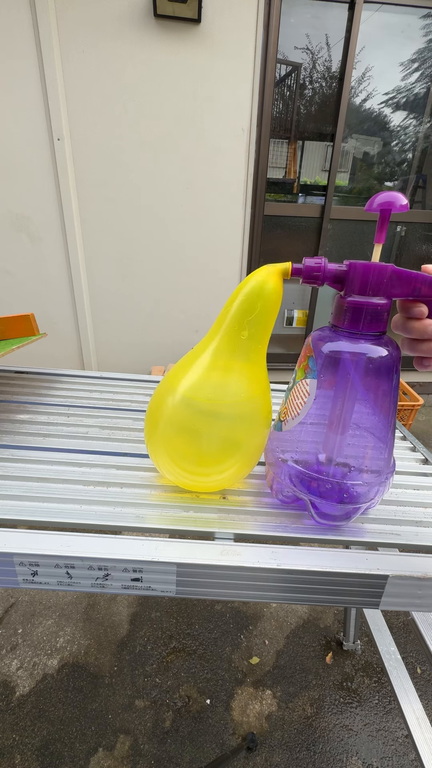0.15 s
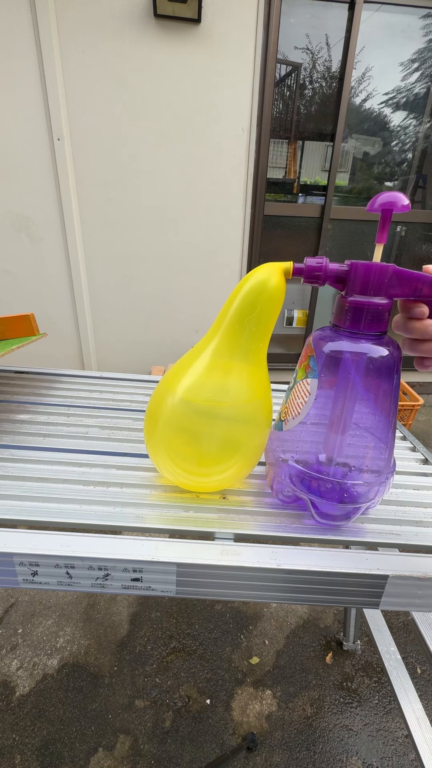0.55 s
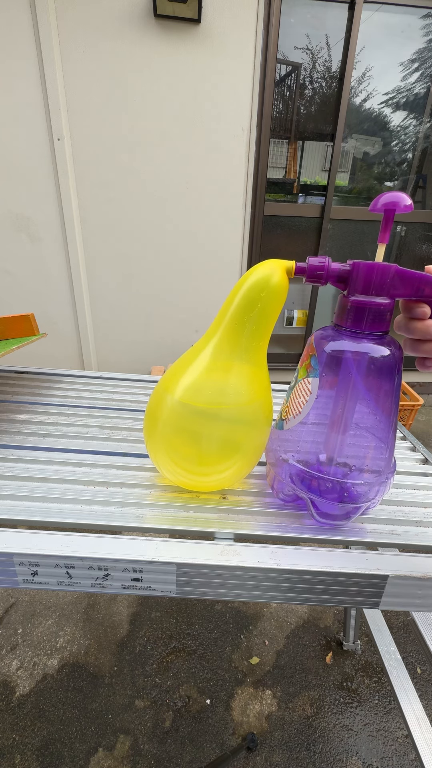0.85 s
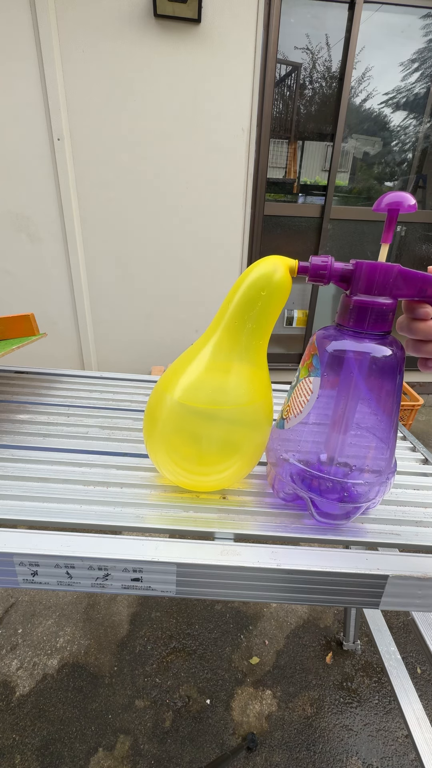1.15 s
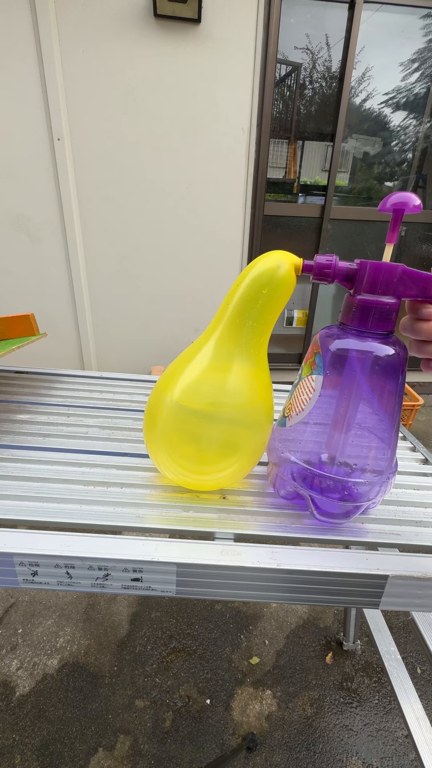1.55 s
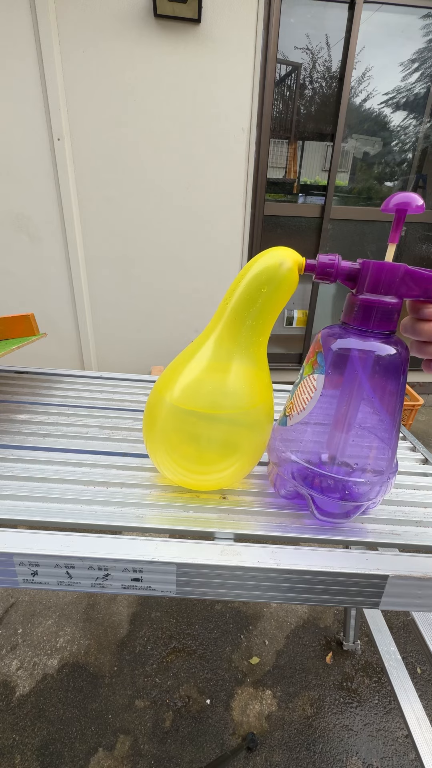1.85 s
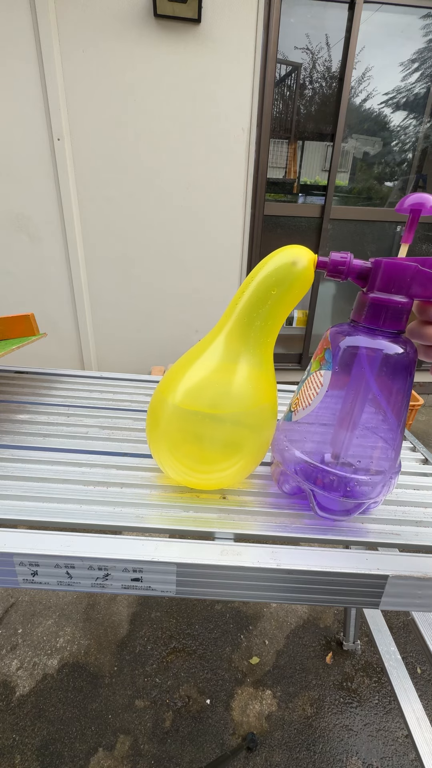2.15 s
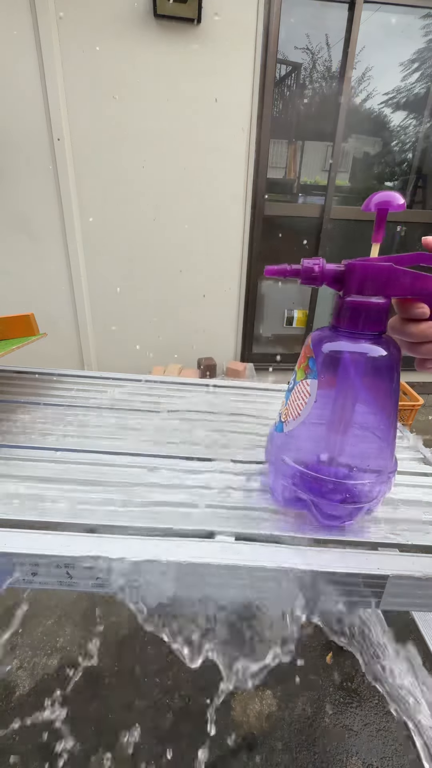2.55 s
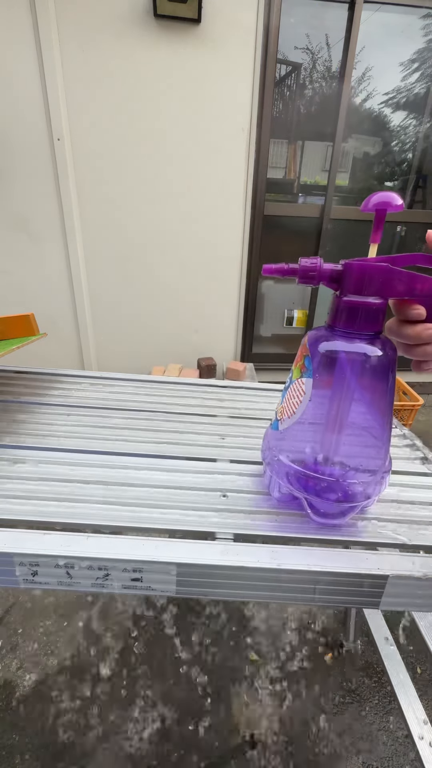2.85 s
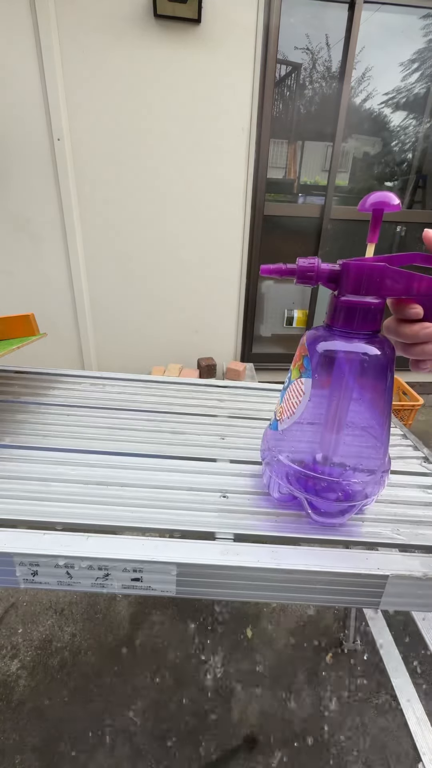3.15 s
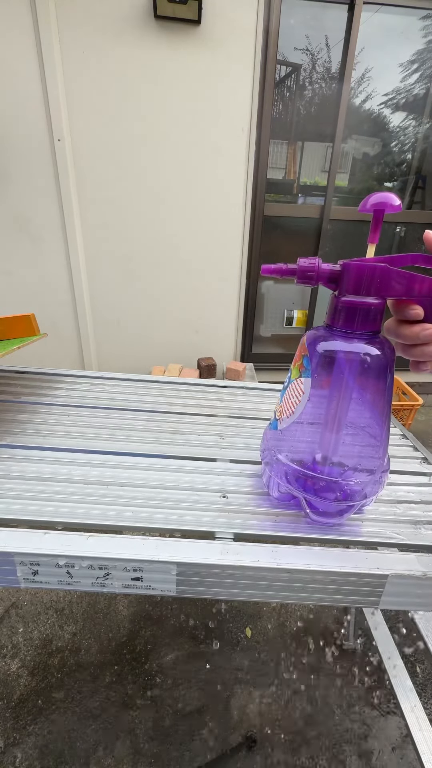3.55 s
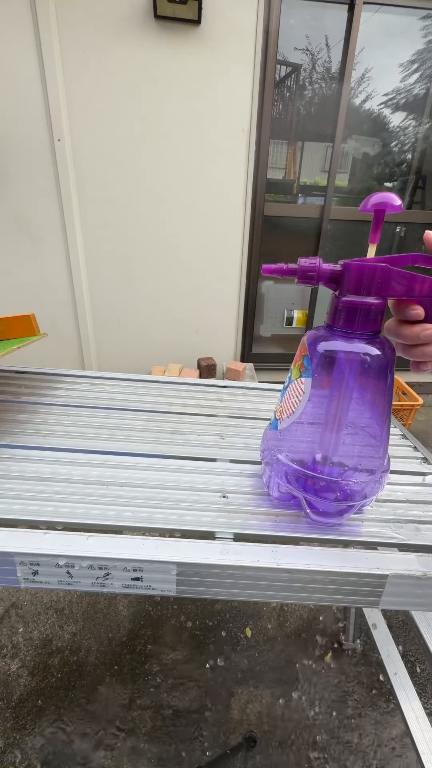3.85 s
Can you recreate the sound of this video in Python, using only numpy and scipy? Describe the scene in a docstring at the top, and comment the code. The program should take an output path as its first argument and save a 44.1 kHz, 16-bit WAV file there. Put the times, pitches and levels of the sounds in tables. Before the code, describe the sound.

A water balloon bursts outdoors: a hand sprayer hisses and gurgles into it, stops, a few ticks, then a sharp loud snap; water spatters onto concrete and thins to drips, close stereo microphone.

```python
"""In a yard with distant air and a mains machine humming nearby, a hand sprayer fills a rubber balloon on a metal table:
shaped noise hisses, gurgling pings rise in it, and the valve shuts at about 2 s. After a few ticks the balloon
tears in rasping noise and wavering tones, snaps, and its air blast thumps in low sagging sines; the background dips.
The water pours off the table onto concrete as grainy noise, with slaps, then thins to ringing drips.
Two microphone ports hear it; much of the treble reaches the right one slightly first."""
import sys
import numpy as np
from scipy import signal
from scipy.fft import rfft, irfft, next_fast_len
from scipy.io import wavfile
from scipy.ndimage import uniform_filter1d, map_coordinates

SR = 44100
rng = np.random.default_rng(int(sys.argv[2]) if len(sys.argv) > 2 else 0)


def gain_from_db(level_db):
    """Turn a decibel level (scalar or array-like) into a linear amplitude factor."""
    decades = np.asarray(level_db, float) / 20
    return 10 ** decades


def master_out(mix):
    """Clip the mix to full scale and print it as 16-bit PCM to the path in sys.argv[1]."""
    frames = np.transpose(np.atleast_2d(mix))
    ceiling = np.clip(frames, -1, 1)
    pcm = np.round(ceiling * 32767).astype(np.int16)
    wavfile.write(sys.argv[1], SR, pcm)


N = 176400

# how alike the jet is at the two microphone ports: (frequency [Hz], likeness [-1 to 1])
JET_LIKENESS = [(100, 1), (600, 0.69), (1500, 0.97), (2400, 1), (3300, 0.67), (5000, 0.39), (7000, 1),
                (16000, 1)]
# how alike the loose water and the echo are at the two ports: (frequency [Hz], likeness [-1 to 1])
WET_LIKENESS = [(100, 0.44), (600, 0.12), (2400, 0.74), (5000, 0.37), (8000, 1), (16000, .9)]


def unit(x):
    """Scale to rms 1."""
    return x / np.sqrt(np.mean(x ** 2) + 1e-20)


def along(points, hz):
    """Read (frequency, value) points along a log frequency axis."""
    f, v = np.transpose(points)
    return np.interp(np.log(hz + 1), np.log(f + 1), v)


def curves(rows):
    """One value per sample for each column after the time."""
    s, *cols = np.transpose(rows)
    return [np.interp(np.arange(N) / SR, s, c) for c in cols]


def wobble(rate):
    """A smooth random curve, rate knots a second."""
    knots = rng.standard_normal(int(N * rate / SR) + 4)
    return map_coordinates(knots, [np.arange(N) * rate / SR])


def filtered(x, response):
    """x times a complex response of frequency."""
    m = next_fast_len(N + 8192)
    return irfft(rfft(x, m) * response(np.fft.rfftfreq(m, 1 / SR)), m)[..., :N]


def shaped_noise(spectrum):
    """Independent noise for each port, coloured by (frequency, level) points; rms 1."""
    return unit(filtered(rng.standard_normal((2, N)), lambda hz: gain_from_db(along(spectrum, hz))))


def ports(pair, likeness):
    """A direct and a scattered sound at two ports; the direct one trails in phase at the left port."""
    # phase by which the left port trails the right: (frequency [Hz], phase [half turns])
    trail = [(1000, 0), (4500, .1), (6300, .4), (8300, .65), (9600, .5), (10900, 1), (13800, 1),
             (15000, 1.2), (16000, 1.35)]

    def turn(hz):
        return np.arccos(np.clip(along(likeness, hz), -1, 1)) / 2

    def lag(hz):
        return np.exp(np.outer([-1j, 1j], np.pi / 2 * along(trail, hz)))

    direct = filtered(pair[0], lambda hz: np.cos(turn(hz)) * lag(hz))
    scattered = filtered(pair[1], lambda hz: np.sin(turn(hz)))
    return direct + [[1], [-1]] * scattered


def water(spectrum, likeness, band, patchy_db, grainy_db, count):
    """Patchy noise plus about count tiny impacts a second of scattered size, coloured; mono rms 1 within the band."""
    grain_t60_s = .0025
    z = signal.stft(rng.standard_normal((2, N)), nperseg=512)[2]
    field = uniform_filter1d(rng.standard_normal(z.shape[1:]), size=4, axis=0)
    field = uniform_filter1d(field, size=4, axis=1)
    noise = signal.istft(z * gain_from_db(patchy_db * unit(field)), nperseg=512)[1][:, :N]
    hits = (rng.random(N) < count / SR) * rng.uniform(0.38, 1.4, N) ** 2
    hits = signal.lfilter([1], [1, -gain_from_db(-60 / SR / grain_t60_s)], hits)
    hits = hits * rng.standard_normal((2, N))
    # close the spectrum just outside its end points
    shut = [(spectrum[0][0] * .7, -120)] + list(spectrum) + [(spectrum[-1][0] * 1.1, -120)]
    mixed = unit(noise) + gain_from_db(grainy_db) * unit(hits)
    x = ports(filtered(mixed, lambda hz: gain_from_db(along(shut, hz))), likeness)
    return x / np.std(filtered(x.mean(0), lambda hz: (hz > band[0]) & (hz < band[1])))


def add(track, s, sound):
    """Mix a sound in at a time."""
    part = track[:, round(s * SR):][:, :sound.shape[-1]]
    part += sound[..., :part.shape[1]]


def yard():
    """Distant air is steady coloured noise; the mains hum is two sines unsteady in level and phase."""
    # hum of the machine nearby: (frequency [Hz], level [dB])
    hum_tones = [(119, -52), (242.2, -52.5)]
    # colour of the distant air: (frequency [Hz], density [dB])
    air_spectrum = [(25, 2), (60, 11.5), (200, 9), (500, 4), (1000, -1), (2400, -8.5), (4500, -13),
                    (6500, -10), (10000, -14.5), (12700, -18), (15700, -15)]
    # the air at the two ports: (frequency [Hz], likeness [-1 to 1])
    air_likeness = [(40, 1), (200, 0.93), (700, 0.25), (3000, 0.29), (16000, 0.63)]
    # the background sinks after the burst: (time [s], level [dB])
    dip = [(2.3, 0), (2.33, -10), (2.44, -14), (2.462, -28), (2.495, -28), (2.53, -13), (2.64, 0)]
    air_db = -54
    t = np.arange(N) / SR
    hum = 0
    for hz, db in hum_tones:
        level = np.sqrt(2) * gain_from_db(db + 0.57 * wobble(6.18))
        hum = hum + level * np.sin(2 * np.pi * hz * t + 0.88 * wobble(5.3))
    air = water(air_spectrum, air_likeness, (300, 4000), patchy_db=1.8, grainy_db=-32, count=300)
    return gain_from_db(curves(dip)[0]) * (gain_from_db(air_db) * air + hum * gain_from_db([[-.5], [.5]]))


def slaps():
    """Lumps of water landing flat: dull noise that starts at once at each impact and dies exponentially."""
    # slaps of heavy water: (time [s], level [dB])
    impacts = [(2.756, -32), (2.851, -26), (2.862, -29), (2.875, -28), (2.9165, -29)]
    # their colour: (frequency [Hz], density [dB])
    slap_spectrum = [(200, -40), (400, -3), (800, 0), (1700, -3.5), (3000, -8.5), (6000, -31)]
    t60_s = 0.025
    t = np.arange(N) / SR
    env = sum((t > s) * gain_from_db(db - 60 * np.abs(t - s) / t60_s) for s, db in impacts)
    return ports(env * shaped_noise(slap_spectrum), WET_LIKENESS)


def drops():
    """Each drop: a tick and crack, a rising ring with a stray second tone near its pitch, then a little spray."""
    # single drops and ticks: (time [s], level [dB], starting ring pitch [Hz])
    landings = [(2.2214, -33, 7300), (2.228, -26, 7100), (2.2385, -30.5, 2600), (2.7292, -26, 6500),
                (2.85, -32, 1070), (2.8595, -29, 1550), (2.8754, -23, 6360), (2.892, -17, 2930),
                (2.911, -18, 2493), (2.9177, -19.5, 2500), (2.942, -23, 6900), (2.948, -20, 5840),
                (2.987, -23, 2100), (3.076, -13.5, 8140), (3.105, -24, 2700), (3.1357, -11, 9200),
                (3.168, -25, 3100), (3.214, -25, 7380), (3.2572, -22, 6500), (3.291, -29.5, 5830),
                (3.3216, -28, 4160), (3.329, -27.5, 3930), (3.345, -28, 6600), (3.3778, -19, 7400),
                (3.421, -20.5, 6640), (3.446, -22, 6170), (3.4689, -25, 2880), (3.489, -22, 8140),
                (3.541, -21.5, 7400), (3.5774, -19, 8500), (3.605, -32, 7300), (3.6364, -23.5, 8500),
                (3.6629, -23.5, 3130), (3.6672, -18.5, 7430), (3.707, -30, 6820), (3.725, -23.5, 7500),
                (3.7388, -22, 9150), (3.7572, -18, 7300), (3.7635, -25, 6500), (3.7735, -30.5, 6700),
                (3.806, -25, 6750), (3.812, -41, 3220), (3.837, -25.5, 2900), (3.8679, -29, 5300),
                (3.883, -22, 8000), (3.8889, -17, 8500), (3.89, -37, 3000), (3.9172, -21.5, 3270)]
    ring_cycles = 5.6  # nominal cycles to fall 15 dB
    tick_gain, crack_gain = 0.71, 0.38  # the tick is the first bright instant of contact
    spray_db, spray_s = -14, 0.032  # starting level, time to fall 20 dB
    spread = 1.48  # crack and spray are filtered to within this factor of the ring
    out, t = np.zeros((2, N)), np.arange(SR // 20) / SR

    def tone(f):
        wave = np.sin(2 * np.pi * f * t * (1 + 12 * t) + [[0], [np.pi / 2]])
        return wave * gain_from_db(-60 * t * f / (4 * ring_cycles)) * (1 - np.exp(-t * f))

    for s, db, hz in landings:
        ring = tone(hz) + 0.3 * tone(min(hz * rng.uniform(0.83, 1.6), 15000))
        band = signal.butter(2, np.clip([hz / spread, hz * spread], 100, 20000), "bandpass", fs=SR)
        noise = 0.47 * unit(signal.lfilter(*band, rng.standard_normal((2, len(t)))))
        flicker = 4.84 * np.repeat(rng.standard_normal(len(t) // 45), 45)  # dB, in steps of about 1 ms
        spray = gain_from_db(spray_db - 60 * t / (3 * spray_s) + flicker)
        crack = crack_gain * gain_from_db(-60 * t / 0.0054)
        tick = tick_gain * np.diff(rng.standard_normal((2, len(t) + 1))) * gain_from_db(-60 * t / 0.0044)
        add(out, s, gain_from_db(db) * (1.26 * ring + tick + noise * (crack + spray)))
    return ports(out, WET_LIKENESS) * gain_from_db([[-.5], [.5]])


def fall():
    """The sheet of water breaks on table and concrete as grainy noise; the thinner it runs, the clumpier."""
    # falling water: (time [s], spatter level [dB], heavy splash level [dB])
    flow = [(2.3, -120, -120), (2.33, -53.5, -71), (2.38, -70.5, -78), (2.45, -62, -64), (2.5, -67, -60.5),
            (2.53, -66, -50.5), (2.58, -53, -51.5), (2.66, -55, -50), (2.715, -52, -52.5),
            (2.73, -38.5, -46), (2.84, -35.5, -48), (2.852, -36, -48), (2.89, -35, -41), (2.92, -33.5, -42),
            (2.98, -31, -36.5), (3.05, -32.5, -43.5), (3.15, -36, -45), (3.2, -41, -61), (3.3, -47.5, -81),
            (3.5, -52, -81), (3.63, -53, -81), (3.75, -49, -81), (4, -47.5, -79)]
    # bright spatter: (frequency [Hz], density [dB])
    spatter_spectrum = [(1300, -33), (2500, -7.5), (4500, -6.5), (6200, -1), (7200, -0.5), (8200, 3),
                        (9300, -2), (11000, -0.5), (12700, -8.5), (14500, 6.5), (15700, -2)]
    # heavy splash: (frequency [Hz], density [dB])
    splash_spectrum = [(300, -24), (500, -12), (1000, -11), (1700, -4), (2500, 0), (3400, -3), (5000, -7)]
    thin_db, clumps_per_db = -36, 0.1  # below this spatter level the flow breaks into dribbles
    spatter_db, splash_db = curves(flow)
    thinness = np.clip(thin_db - spatter_db, 0, 15) * (np.arange(N) > 3 * SR)  # only after 3 s
    clump_db = (1.5 + clumps_per_db * thinness) * (wobble(45) + 0.92 * wobble(140))
    spatter = water(spatter_spectrum, WET_LIKENESS, (4000, 10000), patchy_db=4.0, grainy_db=-2.5, count=700)
    splash = water(splash_spectrum, WET_LIKENESS, (500, 3000), patchy_db=2.8, grainy_db=0, count=500)
    splash_level = gain_from_db(splash_db + 0.34 * clump_db + 0.97 * wobble(30.32))
    return gain_from_db(spatter_db + clump_db) * spatter + splash_level * splash


def tearing_skin(t):
    """The tearing rubber rasps as coloured noise and rings in tones of wandering phase."""
    # the tear: start, loud from, end [s]
    start, loud, end = [2.2835, 2.294, 2.3035]
    # tones of the skin: (frequency [Hz], level [dB], left over right [dB], likeness [-1 to 1])
    skin_tones = [(180, -19, -3, .6), (320, -17, 0, -.7), (555, -12, 0, -.3), (775, -12, 1, -.3),
                  (920, -18, 0, -.3), (1080, -25, 0, .5), (2550, -25, 0, .8), (2870, -23, -3, .7),
                  (3550, -28, 0, .5)]
    # colour of the rasp: (frequency [Hz], density [dB])
    rasp_spectrum = [(60, -40), (120, -11), (300, -5.5), (900, -6), (1200, -14), (2000, -11), (4000, -10),
                     (8000, -18.5), (10500, -30), (15500, -46)]
    rasp_db, waver = -18.5, .55  # waver scales the phase wander, radians
    rise = np.clip((t - start) / (loud - start), 0, 1) ** 1.5
    tear = rise * gain_from_db(-60 * np.clip(t - end, 0, 1) / 0.004)
    skin = 0
    for hz, db, pan_db, likeness in skin_tones:
        phase = 2 * np.pi * hz * (t - end) + rng.uniform(0, 2 * np.pi) + waver * wobble(200)
        between_ports = np.array([[0], [1]]) * np.arccos(np.clip(likeness, -1, 1))
        skin = skin + gain_from_db(db + np.array([[.5], [-.5]]) * pan_db) * np.sin(phase + between_ports)
    return tear * (skin + gain_from_db(rasp_db) * shaped_noise(rasp_spectrum))


def squeal(t):
    """The taut rubber's brief squeal: a sine under a bell-shaped envelope, louder on the left."""
    # frequency [Hz], level [dB], middle [s], half length [s]
    hz, db, middle, half = (4957, -19, 2.2945, .0035)
    bell = np.exp(-.5 * ((t - middle) / half) ** 2)
    return gain_from_db(db + np.array([[4], [-6]])) * bell * np.sin(2 * np.pi * hz * t + [[0], [1.4]])


def snaps_and_thumps():
    """The skin snaps free in damped sines; the burst's air blast thumps at the ports in sines sagging in pitch."""
    # snaps of the skin: (time [s], level [dB], frequency [Hz])
    snaps = [(2.2957, -3, 1300), (2.3031, 1, 1800)]
    # low thumps of the burst's air blast at the microphone ports, sagging in pitch:
    # (time [s], level [dB], from [Hz], sagging to [Hz], decay by 60 dB [s], attack [s])
    thumps = [(2.303, -22, 110, 30, .14, .002), (2.386, -26, 105, 62, .16, .03),
              (2.475, -44, 70, 50, .1, .01), (2.58, -42, 60, 50, .12, .015), (2.655, -43, 55, 45, .3, .02)]
    sag_s = .02
    out, u = np.zeros((2, N)), np.arange(SR // 2) / SR
    for s, db, hz in snaps:
        fade = gain_from_db(db - 60 * u * hz / 5.0)  # 60 dB in five cycles
        add(out, s, fade * np.sin(2 * np.pi * hz * u - 1.2) * (1 - np.exp(-u / 6e-5)))
    for s, db, from_hz, to_hz, t60, attack in thumps:
        turns = to_hz * u + (from_hz - to_hz) * sag_s * (1 - np.exp(-u / sag_s))
        thump = gain_from_db(db - 60 * u / t60) * np.sin(2 * np.pi * turns + [[1.3], [0]])
        add(out, s, thump * (1 - np.exp(-u / attack)) * [[.75], [1.25]])
    return out


def yard_echo(t):
    """The yard's answer to the tear: a diffuse noise that swells, then decays exponentially."""
    # the tear: start, loud from, end [s]
    tear_end = [2.2835, 2.294, 2.3035][2]
    # colour of the answer: (frequency [Hz], density [dB])
    echo_spectrum = [(250, -3), (700, 1.5), (1500, -8), (3000, -12), (5000, -22)]
    # between these times an extra 40 dB fade sets in: start, end [s]
    fade_s = [2.42, 2.47]
    peak_s, peak_db, t60_s = 2.322, -41.5, 0.52
    drop_db = 60 * np.where(t > peak_s, (t - peak_s) / t60_s, (peak_s - t) / 0.13)
    env = (t > tear_end) * gain_from_db(peak_db - drop_db + np.interp(t, fade_s, [0, -40]))
    return env * water(echo_spectrum, WET_LIKENESS, (300, 3000), patchy_db=3.0, grainy_db=-20.0, count=300)


def burst():
    """The skin tears, squeals and snaps, the air blast thumps at the ports, and the yard answers."""
    t = np.arange(N) / SR
    return snaps_and_thumps() + squeal(t) + yard_echo(t) + tearing_skin(t)


def whistles():
    """Breathy whistle of the nozzle: narrow noise around a drifting pitch."""
    # its pitch: (time [s], frequency [Hz])
    pitch = [(0, 6710), (.5, 6880), (1, 6990), (2.0, 6980)]
    # its breath: (width [Hz], level [dB])
    shape = [(450, -4)]
    bands = 0
    for hz, (width, db) in zip(curves(pitch), shape):
        breath = np.array([wobble(width) + 1j * wobble(width) for _ in range(2)])
        bands = bands + gain_from_db(db) * breath * np.exp(2j * np.pi * np.cumsum(hz) / SR)
    return ports(bands.real, JET_LIKENESS)


def bubbles(count):
    """Air dragged into the water: count rising pings in all, at random moments and pitches; rms 1."""
    median_hz, spread, cycles = 1415, 0.4, 7.8  # starting pitch, its log spread, nominal cycles to fall 20 dB
    s, pitch, size = rng.random(count), rng.standard_normal(count), rng.uniform(0.32, 1.3, count)
    hz, t = median_hz * np.exp(spread * pitch)[:, None], np.arange(900) / SR
    ping = size[:, None] ** 2 * np.sin(2 * np.pi * hz * t * (1 + 9 * t))
    ping = ping * gain_from_db(-60 * t * hz / (3 * cycles)) * (1 - np.exp(-t * hz))
    places = (s * N).astype(int)[:, None] + np.arange(900)
    return unit(np.bincount(places.ravel(), ping.ravel(), N + 900)[:N])


def jet():
    """Turbulence sputters in three places: the water inside, the balloon neck, the nozzle."""
    # the jet: (time [s], gurgle level [dB], balloon neck level [dB], nozzle fizz level [dB])
    levels = [(0, -24, -27, -30.5), (.025, -26.5, -33, -27.5), (.04, -19.5, -21, -23.5),
              (.055, -27, -36, -29.5), (.17, -25, -30, -28.5), (.35, -27.5, -28, -27.5),
              (.56, -29.5, -27, -27), (.83, -31, -24, -28.5), (1.0, -31, -25, -31),
              (1.3, -33, -27.5, -30.5), (1.6, -34, -27, -32), (1.9, -34, -27.5, -32.5),
              (1.993, -37.5, -27, -32), (2.005, -43, -37, -25), (2.014, -45, -51, -38),
              (2.04, -60, -50, -53.5), (2.044, -75, -70, -64), (2.13, -120, -120, -120)]
    # water inside the balloon: (frequency [Hz], density [dB])
    gurgle_spectrum = [(150, -12.5), (400, -12.5), (900, -6.5), (1300, -4), (1650, 2.5), (1950, -2),
                       (2900, -4), (3400, -10), (4200, -17.5)]
    # balloon neck: (frequency [Hz], density [dB])
    neck_spectrum = [(1800, -57), (2050, -15), (2150, 0), (2400, 4.5), (2560, 1), (2700, -6.5),
                     (3300, -21.5), (4200, -17.5), (5200, -24.5)]
    # nozzle: (frequency [Hz], density [dB])
    fizz_spectrum = [(3500, -13), (4500, -12.5), (5300, -8), (6000, -5), (7000, -1), (7600, -2.5),
                     (8000, -1), (8600, -6.5), (9500, -7.5), (10300, -7.5), (11300, -1), (13600, -12),
                     (14800, -0.5), (15700, -12)]
    bubble_db = -5.5  # before the gurgle level
    gurgle_db, neck_db, fizz_db = curves(levels)
    sputter_db = 1.0 * wobble(69.56) + 0.59 * wobble(160)
    gurgle = water(gurgle_spectrum, JET_LIKENESS, (400, 1900), patchy_db=2.0, grainy_db=-6.5, count=500)
    gurgle = gurgle + gain_from_db(bubble_db) * bubbles(count=1600)
    neck = water(neck_spectrum, JET_LIKENESS, (2000, 3200), patchy_db=1.0, grainy_db=-5.0, count=700)
    fizz = water(fizz_spectrum, JET_LIKENESS, (5000, 10000), patchy_db=2.5, grainy_db=-6, count=1500)
    fizz = fizz + whistles()
    return (gain_from_db(gurgle_db + 1.25 * sputter_db + 0.6 * wobble(39.95)) * gurgle
            + gain_from_db(neck_db + sputter_db + 0.55 * wobble(25.16)) * neck
            + gain_from_db(fizz_db + 0.97 * sputter_db + 0.9 * wobble(12.47)) * fizz)


def scene():
    """All sources at the two ports."""
    return yard() + slaps() + drops() + fall() + burst() + jet()


def low_pass(x):
    """Removes everything above the highest recorded frequency."""
    return signal.sosfilt(signal.butter(12, 16940, fs=SR, output="sos"), x)


def record(dry):
    """The microphone ports' first-order bass roll-off and a sharp upper band limit."""
    low_hz, top_hz = 45, 15900
    mix = filtered(dry, lambda hz: (hz < top_hz) * (1j * hz / (low_hz + 1j * hz)))
    return low_pass(mix)


dry = scene()
out = record(dry)
master_out(out)
```